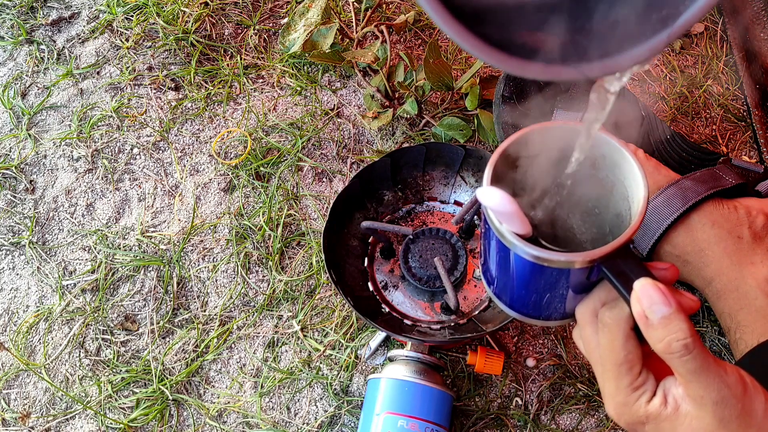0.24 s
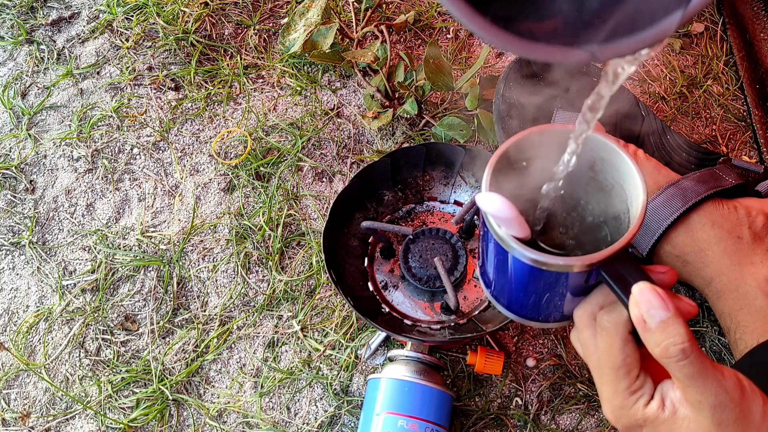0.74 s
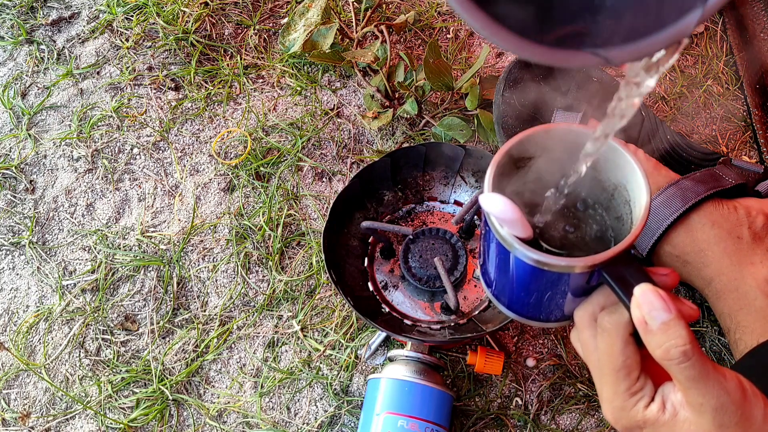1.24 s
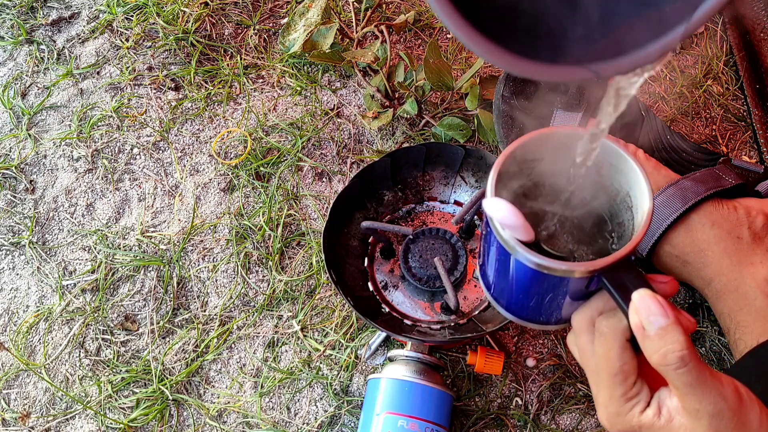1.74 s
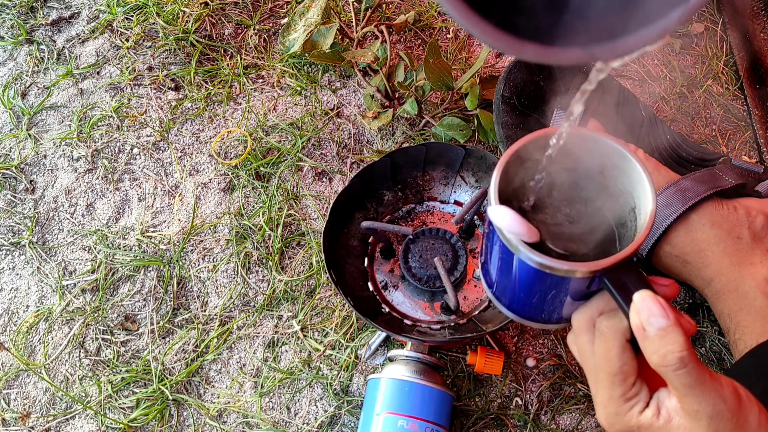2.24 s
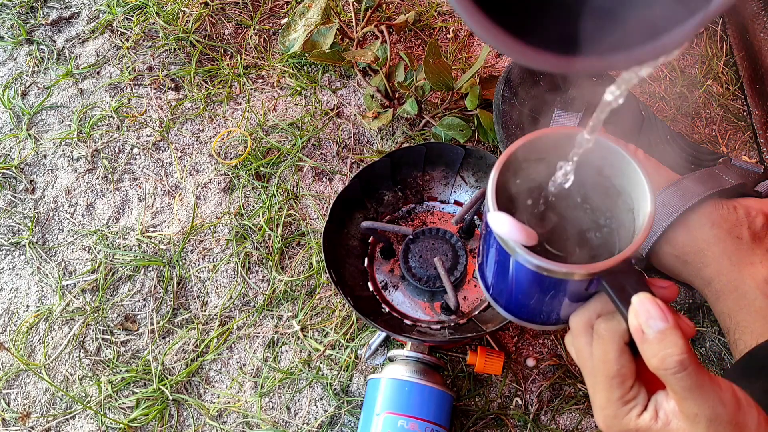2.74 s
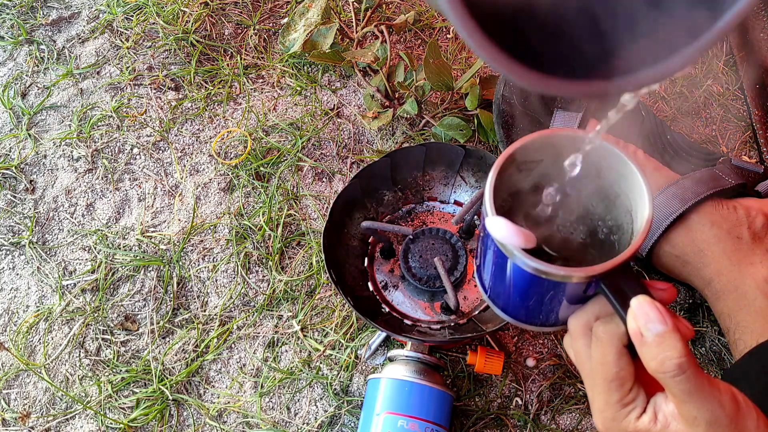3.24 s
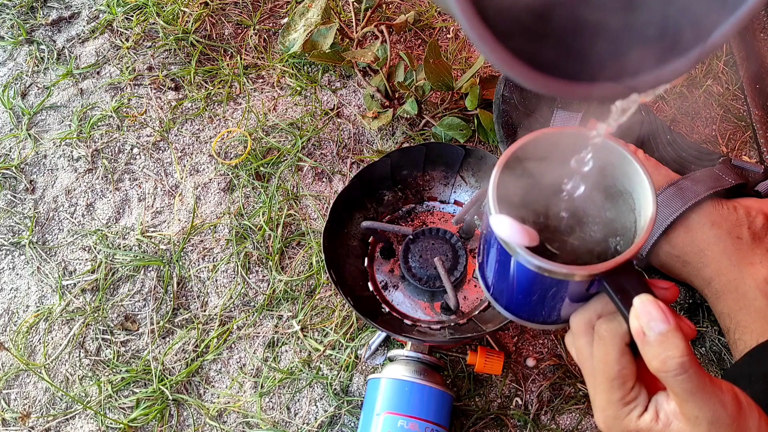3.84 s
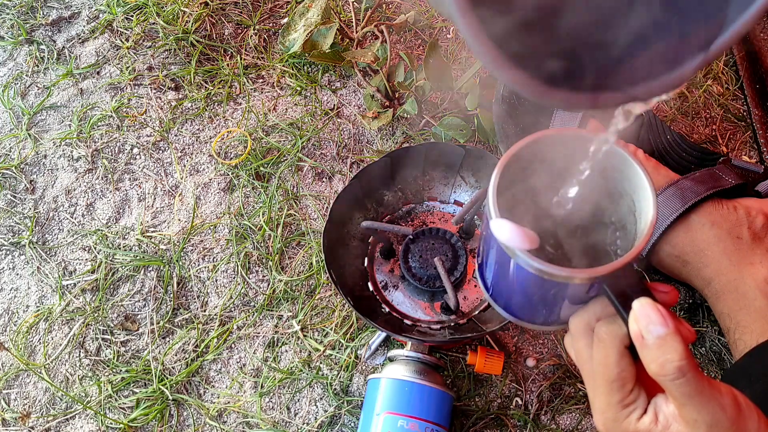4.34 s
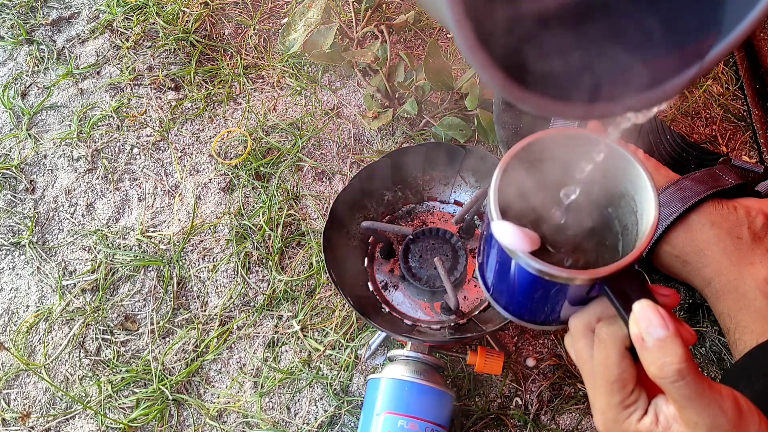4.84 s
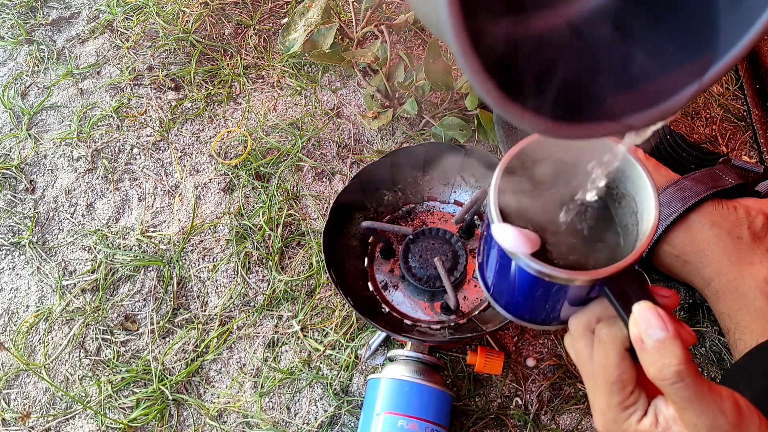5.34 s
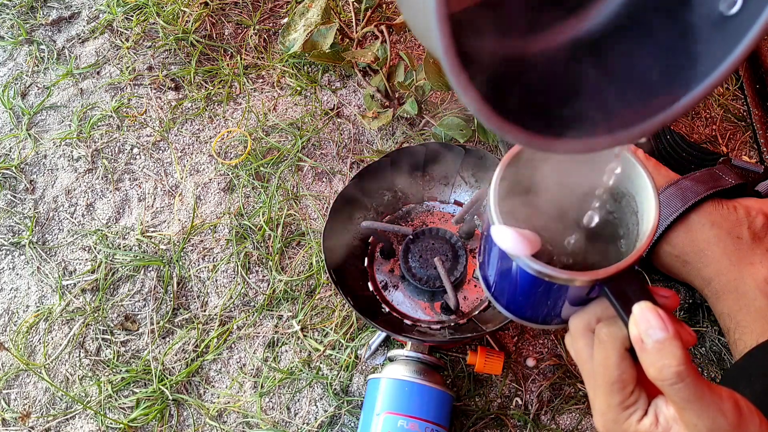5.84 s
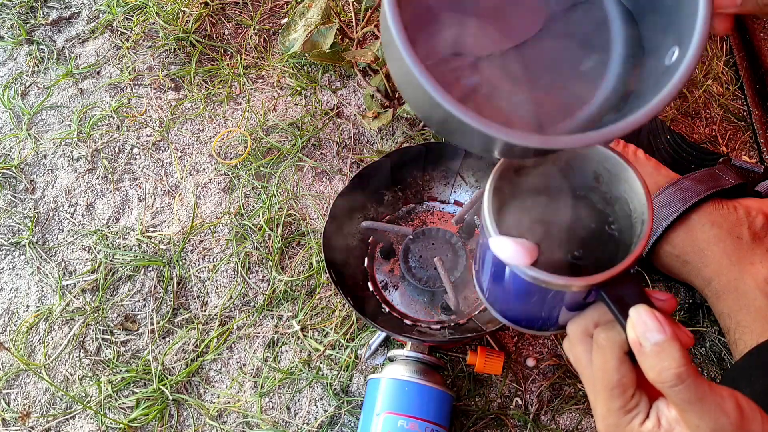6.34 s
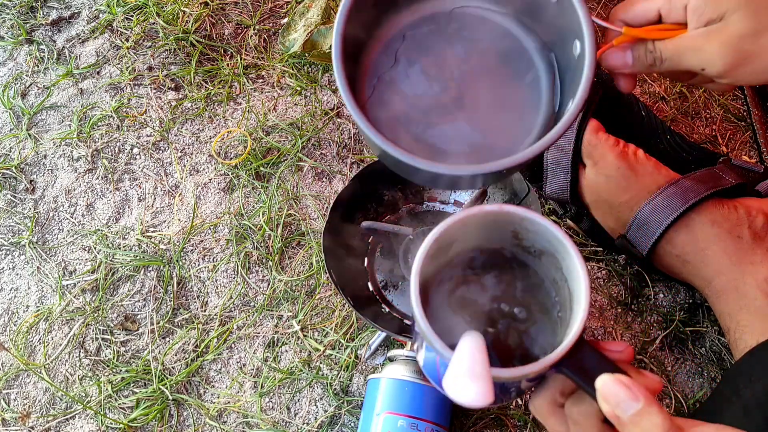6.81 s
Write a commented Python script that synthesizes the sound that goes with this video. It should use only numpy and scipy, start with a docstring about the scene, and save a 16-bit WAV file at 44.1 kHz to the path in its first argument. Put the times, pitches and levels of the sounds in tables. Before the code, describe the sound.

A thin stream of water dribbles from a pot into a metal mug, ending with a sharp metal knock and brief scrape.

```python
"""Hot water dribbles from a camping pot into a metal mug, close by, outdoors.
The thin stream breaks into drops that splash, trap bubbles and ring the air in the mug; the pitch
rises as it fills. Now and then water sizzles on the hot pot wall. As the pot is righted it knocks
against the mug, scrapes off it and ticks once. Low handling bumps and faint open air lie underneath."""
import sys
import numpy as np
from scipy import signal
from scipy.fft import rfft, irfft
from scipy.io import wavfile

SR = 44100
rng = np.random.default_rng(int(sys.argv[2]) if len(sys.argv) > 2 else 0)


def wav_record(signal):
    """Record a signal, one row per channel, as 16-bit PCM in the file named by sys.argv[1]."""
    frames = np.transpose(np.atleast_2d(signal))
    bounded = np.clip(frames, -1, 1)
    # unit amplitude maps onto the largest positive 16-bit level
    quanta = np.round(bounded * 32767).astype(np.int16)
    wavfile.write(sys.argv[1], SR, quanta)


N = 311787
TIME_S = np.arange(N) / SR

# Table levels are relative; the functions apply their own gains.
# outdoor air spectrum: (frequency [Hz], density [dB])
AIR_SPECTRUM = [(8, -3.5), (16, -14.5), (30, -19), (60, -17.5), (110, -21), (200, -29), (500, -35),
                (1300, -40), (2500, -45), (7000, -50.5), (13000, -50), (15500, -53.5)]
# stream strength as the pot tips: (time [s], patter [dB], spray [dB])
STREAM_LEVELS = [(0, -60.5, -64), (0.22, -65, -76.5), (0.45, -65, -71), (0.88, -62, -71),
                 (1.28, -60, -69.5), (1.48, -68, -75.5), (1.78, -58.5, -66.5), (2.0, -70.5, -80),
                 (2.2, -58.5, -74), (2.65, -60.5, -74.5), (3.27, -60.5, -68), (3.6, -65, -73),
                 (3.92, -74.5, -80), (4.15, -59.5, -66.5), (4.3, -67.5, -77), (4.7, -65, -72),
                 (5.1, -68.5, -77.5), (5.55, -64, -71.5)]
# end of the stream: (start [s], end [s], fall [dB])
STREAM_END = (5.73, 5.893, 16)
# air resonances of the filling mug: (time [s], depth mode [Hz], cross mode [Hz])
AIR_MODES = [(0, 967, 2926), (1.5, 986, 2956), (3, 1070, 3030), (4.5, 1124, 2930), (6, 1164, 3155)]
# splash inside the mug: (frequency [Hz], gain [dB])
SPLASH_SPECTRUM = [(200, -36.5), (900, 17.5), (1350, 6), (1750, 13), (2200, -0.5), (2800, -1),
                   (3400, -28.5), (3900, -1), (4900, 5.5), (7200, -1), (9000, 0.5), (11500, -4),
                   (15500, -29)]
# higher air resonances: (frequency [Hz], width [Hz], gain over the splash [dB])
AIR_OVERTONES = [(1566, 50, 1.5), (1888, 88, -2.5), (3150, 42, 33), (4120, 57, 7), (4780, 9.7, 3),
                 (5870, 41, 6), (6560, 51, 0), (7130, 380, 2.5), (7340, 33, 4.5), (8200, 80, -4.5),
                 (8700, 150, 2.5)]
# big drops: (time [s], plop pitch [Hz], plop [dB], gulp [dB], cross ring [dB], splash [dB],
# splash peak [Hz])
BIG_DROPS = [(0.011, 954, -53.5, -85, -50.5, -54, 5500), (0.059, 930, -58.5, -77, -61, -62, 7600),
             (0.331, 910, -59, -83, -59.5, -66, 3860), (0.358, 1060, -55.5, -76, -58, -64, 4500),
             (0.504, 1320, -57, -73, -59, -60, 10700), (0.762, 1230, -58, -57, -40.5, -53.5, 3930),
             (0.811, 950, -50.5, -67, -57, -61, 3920), (0.821, 930, -54.5, -69, -60, -62, 7040),
             (0.87, 950, -47.5, -63, -46.5, -59.5, 3900), (0.898, 960, -65, -63, -61, -58, 7700),
             (0.918, 984, -50, -79, -56, -65, 3900), (0.934, 940, -64, -66, -59, -54.5, 7750),
             (1.022, 970, -61, -72, -59, -59, 7360), (1.103, 1110, -74, -75, -57, -60.5, 3900),
             (1.283, 980, -58, -60, -49.5, -57, 3900), (1.301, 1010, -46, -54.5, -57, -62, 3900),
             (1.579, 940, -51, -58, -71, -71, 3900), (1.754, 950, -61, -81, -50, -62, 4000),
             (1.841, 1050, -58.5, -64, -54.5, -63, 3930), (1.885, 1080, -64, -77, -70, -64.5, 8800),
             (2.109, 1035, -48, -60, -52, -60, 3930), (2.132, 966, -51, -59, -56, -64, 3900),
             (2.204, 948, -47.5, -47.5, -59, -68, 4600), (2.227, 1034, -41.5, -57.5, -54.5, -63, 3900),
             (2.25, 980, -48, -57, -54, -62.5, 3900), (2.264, 1070, -45, -57, -61, -65, 4500),
             (2.28, 1060, -60, -72, -54, -61, 6650), (2.415, 1030, -40.5, -49, -51.5, -60, 3900),
             (2.463, 960, -61, -70, -52, -59, 3890), (2.477, 990, -44.5, -58, -51.5, -65, 3900),
             (2.495, 990, -52, -70, -54, -61, 4570), (2.533, 950, -49.5, -58, -54.5, -65, 3900),
             (2.577, 1060, -44.5, -53.5, -54, -67, 3900), (2.604, 1120, -50.5, -66, -55, -62.5, 3900),
             (2.636, 1080, -51.5, -61, -51.5, -61, 3900), (2.751, 1093, -52, -81, -68, -73, 4400),
             (2.799, 1120, -48.5, -59, -49.5, -57, 3900), (2.819, 1030, -51.5, -72, -51, -56, 4400),
             (2.887, 1280, -59, -71, -47.5, -60, 3900), (2.897, 940, -70, -68, -45.5, -53, 3800),
             (2.928, 975, -49.5, -51, -58, -54, 6200), (2.941, 1130, -48, -55, -66, -64, 6000),
             (2.958, 1100, -56, -54.5, -67, -59, 5200), (3.016, 1100, -64, -77, -64, -56.5, 5950),
             (3.037, 980, -50, -60, -59, -58.5, 4480), (3.062, 1060, -51, -71, -51.5, -75, 3900),
             (3.099, 1070, -56, -67, -56, -59.5, 4500), (3.15, 1210, -69, -67, -55.5, -59.5, 5700),
             (3.163, 1037, -46, -53, -59, -62, 3900), (3.2, 1040, -51, -56, -47, -57.5, 3860),
             (3.225, 1130, -46, -52.5, -40, -58, 3870), (3.246, 1083, -43.5, -69, -48.5, -58, 3900),
             (3.273, 1130, -38.5, -55.5, -56.5, -68, 3900), (3.305, 1010, -48, -56, -72, -63, 4800),
             (3.323, 1070, -51, -58, -63, -59, 6150), (3.369, 1120, -50.5, -64, -56.5, -53.5, 11500),
             (3.407, 1140, -45.5, -58, -56.5, -71, 3900), (3.436, 1110, -57, -68, -80, -57.5, 5900),
             (3.48, 1075, -49, -58, -62, -85, 3900), (3.552, 1090, -51.5, -60, -58, -62.5, 8800),
             (3.579, 960, -44, -49, -62, -71, 3875), (3.673, 1130, -47.5, -48, -51.5, -83, 3900),
             (3.69, 1120, -58, -66, -64, -58.5, 4930), (3.712, 1150, -53.5, -55, -54.5, -68, 8900),
             (3.741, 1070, -50, -56, -51, -56.5, 11400), (3.766, 1080, -54, -66, -58, -63, 9400),
             (3.873, 1133, -52.5, -68, -77, -71, 11200), (4.001, 1100, -78, -74, -63, -57, 5470),
             (4.115, 1100, -50.5, -55.5, -65, -77, 8800), (4.201, 1154, -46, -61, -60, -73, 3900),
             (4.459, 1080, -48.5, -57, -60.5, -70, 3870), (4.513, 990, -63, -60, -59, -54, 8600),
             (4.605, 1140, -54.5, -66, -54.5, -66, 3900), (4.656, 1064, -46.5, -58, -76, -62.5, 5910),
             (4.695, 1160, -49, -56, -71, -73, 5700), (4.73, 1110, -50, -58, -57, -55, 5800),
             (4.749, 1140, -62, -58, -53.5, -52.5, 8900), (4.777, 1170, -52.5, -59, -60, -69, 6700),
             (4.806, 1140, -62, -64, -57, -63.5, 5400), (4.838, 950, -63, -54, -59.5, -61, 9400),
             (4.862, 1230, -53.5, -56.5, -64, -79, 3900), (4.907, 1180, -59, -57, -53, -66, 3900),
             (4.924, 1280, -76, -71, -58.5, -63, 8630), (5.015, 1156, -52, -61, -64, -59, 6700),
             (5.088, 980, -55.5, -55, -62, -69, 7100), (5.134, 1050, -57, -57, -44.5, -55.5, 3800),
             (5.172, 1100, -53, -56.5, -76, -80, 3900), (5.233, 1180, -49, -56, -56.5, -60.5, 6200),
             (5.283, 1150, -59, -55.5, -55, -49.5, 6950), (5.319, 1240, -53, -58, -58, -62, 5780),
             (5.387, 1175, -44.5, -48, -55.5, -70, 3900), (5.412, 1180, -50, -66, -53, -59, 6000),
             (5.452, 1200, -53, -58, -78, -75, 3900), (5.555, 1070, -49, -55.5, -57, -61.5, 7220),
             (5.605, 1175, -36, -60, -60.5, -65, 8700), (5.7, 1120, -54.5, -60, -57.5, -60, 10000),
             (5.967, 914, -60, -79, -88, -78, 11500), (6.117, 1250, -70, -97, -67.5, -67.5, 10800)]
# bead level slopes as the water deepens: (plop [dB/s], gulp [dB/s], cross ring [dB/s], splash [dB/s])
BEAD_SLOPES = (1, 1, 0.56, 1)
# water on the hot wall: (peak time [s], rise [s], fall [s], level [dB], centre [Hz], width [oct])
SIZZLE_SWELLS = [(.435, 0.017, 0.071, -62, 2170, 0.72), (.685, 0.051, 0.016, -66, 2680, 0.26),
                 (.95, 0.13, 0.11, -69, 4740, 0.46), (1.125, 0.016, 0.024, -54, 1940, 0.9),
                 (2.82, 0.051, 0.059, -58.5, 4900, 0.9), (2.98, 0.039, 0.036, -72, 5900, 0.6)]
# larger trapped bubbles: (time [s], level [dB], pitch [Hz])
LARGE_BUBBLES = [(0.4625, -39, 2040), (0.608, -43, 1580), (0.8706, -44, 1570), (1.126, -39.5, 1530),
                 (2.1118, -37.5, 1680), (2.132, -44, 1710), (2.9304, -59, 1790), (3.2233, -41, 1600),
                 (3.917, -44, 1460), (5.235, -44, 1600), (5.4807, -39.5, 1700)]
# handling bumps: (peak time [s], rise [s], fall [s], level [dB], centre [Hz], width [oct])
BUMP_SWELLS = [(2.25, 0.16, .2, -84, 160, 2.2), (2.85, 0.37, .1, -65.5, 69, 0.7),
               (3.07, 0.033, 0.026, -58, 197.3, 0.044), (3.09, 0.047, 0.076, -61, 66.3, 0.16),
               (3.26, 0.17, 0.12, -65, 90, 1.8), (7.045, 0.016, 0.029, -57.5, 167, 1.1),
               (7.058, 0.015, .04, -43, 64, 0.15)]
# pot against mug: (time [s], level [dB], contact time [s])
IMPACTS = [(6.3158, -5.5, 0.0011), (6.3374, -27.5, 0.00027), (6.3545, -38.5, .0003),
           (6.3685, -51.5, 0.00029)]
# modes of pot and mug: (frequency [Hz], level [dB], t60 [s])
METAL_MODES = [(376, -19, 0.094), (449.4, -4.5, 0.14), (684.6, -22, 0.09), (714, -14.5, 0.17),
               (878, -20, .09), (918.6, -10.5, 0.094), (970, 2, 0.025), (1014, 6, 0.055), (1093, -20, .18),
               (1150, -17.5, 0.23), (1346, -22, 0.15), (1624, -20.5, 0.15), (1680, -21, .1),
               (1774, -28, .11), (1780, -23.5, 0.15), (1940, -38, 0.1), (2263, -24, 0.064),
               (2510, -30.5, 0.12), (2812, -22, .055), (2960, -25.5, 0.087), (3520, -29.5, .08),
               (3930, -33, 0.094), (4580, -19, .065), (4430, -28, .06), (4750, -31.5, 0.083),
               (5740, -32.5, 0.052), (6800, -43, .06), (8340, -36, 0.043), (9050, -42, 0.052),
               (11260, -39.5, 0.036)]
# dense clank under the modes: (frequency [Hz], density [dB], t60 [s])
CLANK_SPECTRUM = [(40, -7, 0.049), (160, -11, 0.019), (277, -2.5, 0.066), (347, 4, 0.1), (556, -2.5, 0.032),
                  (835, 8, 0.061), (1266, 0.5, 0.07), (1830, -2, 0.089), (2230, -21, 0.11),
                  (3220, -0.5, 0.027), (4600, -11.5, 0.04), (5200, -14, 0.045), (10500, -23, 0.03),
                  (15640, -36.5, 0.05)]
# rims sliding apart: (time [s], pressure [dB])
RIM_PRESSURE = [(6.38, -67), (6.42, -69), (6.465, -65), (6.482, -54.5), (6.499, -56), (6.502, -46),
                (6.509, -57), (6.525, -80)]
# modes of the rubbed rim: (frequency [Hz], level [dB], t60 [s])
RIM_MODES = [(737, -10.5, 0.11), (1055, -5, 0.11), (1324, -2, 0.074), (1873, -2, 0.042), (3630, -14, 0.055),
             (4409, -30, 0.18), (5749, -37, 0.081), (6400, -30, 0.16)]
# last contact: (time [s], level [dB])
LIFT_TICK = [(6.649, -58.5)]
# modes of that contact: (frequency [Hz], level [dB], t60 [s])
TICK_MODES = [(1420, -2, 0.017), (2640, -0.18, 0.0096)]


def amp(db):
    """Decibels to gain."""
    return 10 ** (np.asarray(db) / 20)


def unit(x):
    """Scale to rms 1."""
    return x / np.sqrt(np.mean(x ** 2) + 1e-30)


def at_level(x, db, span_s=.01):
    """Scale a short sound to the energy of span_s at rms level db."""
    return x * amp(db) * np.sqrt(span_s * SR / np.sum(x ** 2))


def lookup(points, hz):
    """Interpolate on a log-frequency axis."""
    point_hz, value = np.transpose(points)[:2]
    return np.interp(np.log(hz + 1), np.log(point_hz + 1), value)


def add(mix, s, sound):
    """Mix a sound in at time s."""
    part = mix[max(round(s * SR), 0):][:len(sound)]
    part += sound[:len(part)]


def colour(x, points, size=4096):
    """Minimum-phase filter from (frequency [Hz], gain [dB]) points; attacks stay sharp."""
    log_gain = np.log(amp(lookup(points, abs(np.fft.fftfreq(size, 1 / SR)))))
    taps = np.fft.ifft(np.exp(np.conj(signal.hilbert(log_gain)))).real
    return signal.fftconvolve(x, taps[:size // 2])[:len(x)]


def resonate(x, hz, width_hz):
    """Unity-gain resonance, steady or gliding."""
    carrier = np.exp(2j * np.pi * np.cumsum(hz * np.ones(len(x))) / SR)
    pole = np.exp(-np.pi * width_hz / SR)
    return 2 * (carrier * signal.lfilter([1 - pole], [1, -pole], x / carrier + 1e-18)).real


def ring(modes, t):
    """Decaying modes, starting in phase."""
    return sum(amp(db - 60 * t / t60_s) * np.sin(2 * np.pi * hz * t) for hz, db, t60_s in modes)


def clicks(per_s, spread_db):
    """Random impulses of uneven size."""
    size = amp(spread_db * np.minimum(rng.exponential(1, N), 4)) * rng.choice([-1, 1], N)
    return unit(size * (rng.random(N) < per_s / SR))


def burst(t, rise_s, decay_s, tail_db, tail_s=0.0049):
    """Splash envelope: quick rise, quick fall, weaker tail."""
    return (1 - np.exp(-(t / rise_s) ** 2)) * (np.exp(-t / decay_s) + amp(tail_db) * np.exp(-t / tail_s))


def swells(rows, source):
    """Gaussian swells of a source, each in its own band."""
    octave = np.log2(np.fft.rfftfreq(N, 1 / SR) + 1)
    spectrum, out = rfft(source), np.zeros(N)
    for s, rise_s, fall_s, db, hz, width_oct in rows:
        band = unit(irfft(spectrum * np.exp(-.5 * ((octave - np.log2(hz)) / width_oct) ** 2), N))
        envelope = np.exp(-.5 * ((TIME_S - s) / np.where(TIME_S < s, rise_s, fall_s)) ** 2)
        out += amp(db) * band * envelope
    return out


def outdoor_air(level_db=-63, drift_db=2):
    """Faint even hiss over the rumble of slowly moving air."""
    hz = np.fft.rfftfreq(N, 1 / SR)
    spectrum = rfft(rng.standard_normal(N)) * amp(lookup(AIR_SPECTRUM, hz))
    drift = unit(irfft(rfft(rng.standard_normal(N)) * np.exp(-hz / 3), N))
    steady = irfft(spectrum, N)
    rumble = irfft(spectrum / (1 + (hz / 150) ** 2), N)
    return amp(level_db) * (steady + rumble * (amp(drift_db * drift) - 1)) / np.std(steady)


def flow_db(s):
    """Patter and spray levels at times s; both fall as the stream ends."""
    when_s, patter_db, spray_db = np.transpose(STREAM_LEVELS)
    fall_db = np.interp(s, STREAM_END[:2], [0, STREAM_END[2]])
    return np.interp(s, when_s, patter_db) - fall_db, np.interp(s, when_s, spray_db) - fall_db


def mug_modes_hz(s):
    """Depth and cross resonances of the air in the mug at times s."""
    when_s, depth_hz, cross_hz = np.transpose(AIR_MODES)
    return np.interp(s, when_s, depth_hz), np.interp(s, when_s, cross_hz)


def in_mug(x):
    """The mug's hollow colours spray and adds its overtones."""
    hollow = colour(signal.unit_impulse(4096), SPLASH_SPECTRUM)
    overtones = sum(amp(db) * resonate(hollow, hz, width_hz) for hz, width_hz, db in AIR_OVERTONES)
    return signal.oaconvolve(x, hollow + overtones)[:N]


def droplets(per_s, spread_db, decay_s):
    """Crowd of tiny splashes, each a decaying puff of noise."""
    power = signal.lfilter([1], [1, -np.exp(-2 / (decay_s * SR))], clicks(per_s, spread_db) ** 2)
    return unit(np.sqrt(power) * rng.standard_normal(N))


def bubble(hz, cycles, glide):
    """One bubble: a tone that swells, rises slightly and dies within a few cycles."""
    age = np.arange(round(.02 * SR)) / SR * hz / cycles
    envelope = 2 * age * np.exp(1 - 2 * age)
    pitch_hz = hz * (1 + glide * np.tanh(age - .5))
    return envelope * np.sin(2 * np.pi * np.cumsum(pitch_hz) / SR)


def tiny_bubbles(per_s=170, spread_db=2, sizes=24):
    """Trapped bubbles of many sizes ring at random times."""
    out = np.zeros(N)
    for hz in np.geomspace(1300, 6000, sizes):
        tone = bubble(hz, cycles=2.8, glide=0.036) / np.sqrt(hz)
        for position, weakness in rng.random((round(per_s * N / SR / sizes), 2)):
            add(out, position * N / SR, amp(-spread_db * np.log(weakness + .05)) * tone)
    return unit(out)


def trickle(gain_db=-3.5):
    """The finest droplets patter, bubble and spray in the mug."""
    patter_db, spray_db = flow_db(TIME_S)
    depth_hz, cross_hz = mug_modes_hz(TIME_S)
    taps = droplets(per_s=590, spread_db=4, decay_s=0.00047)
    depth = unit(resonate(taps, depth_hz, width_hz=102))
    cross = amp(-3) * unit(resonate(taps, cross_hz, width_hz=150))
    gulp = amp(-8) * unit(resonate(taps, 410, width_hz=180))
    thud = amp(-12) * unit(resonate(taps, 270, width_hz=440))
    wash = amp(-6) * unit(resonate(taps, 910, width_hz=2800))
    patter = unit(colour(depth + cross + gulp + thud + wash, [(3400, 1.5), (5000, -20), (12000, -21)]))
    patter += amp(-6) * tiny_bubbles()
    mist = unit(in_mug(droplets(per_s=180, spread_db=1.5, decay_s=0.0038)))
    return amp(gain_db) * (amp(patter_db) * patter + amp(spray_db) * mist)


def crackle(gain_db=-6):
    """Pinhead droplets tick on the metal wall, louder when the spray is strong."""
    _, spray_db = flow_db(TIME_S)
    hits = unit(in_mug(droplets(per_s=45, spread_db=4, decay_s=0.00026)))
    return amp(spray_db + gain_db) * hits


def drops(rows, chirp=0.067, roughness=0.24):
    """Each drop slaps the surface and opens a crater that pumps the air in the mug."""
    t = np.arange(round(.05 * SR)) / SR
    tones, spray = np.zeros((2, N))
    for s, hz, plop_db, gulp_db, cross_db, splash_db, bright_hz in rows:
        grit, froth, fizz = rng.standard_normal((3, len(t)))
        phase, detune, length, depth, girth, trapped = rng.uniform(-1, 1, 6)
        depth_hz, cross_hz = mug_modes_hz(s)
        # crater pulse rises in pitch as it closes; the air column rings on
        turns = np.cumsum(hz * (1 + chirp * np.tanh(t / 0.0032 - 1))) / SR
        pulse = np.sin(2 * np.pi * turns + np.pi * phase) + roughness * grit
        pulse *= burst(t, rise_s=0.0024, decay_s=0.0011, tail_db=-25)
        plop = resonate(pulse, hz, width_hz=620) + .5 * resonate(pulse, depth_hz, width_hz=550)
        add(tones, s, at_level(plop, plop_db))
        # closing crater traps a bubble
        blip = bubble(1650 * 1.124 ** trapped, cycles=4, glide=0.089)
        add(tones, s, amp(plop_db - 9 + 3.6 * length) * blip)
        # displaced water
        gulp = np.sin(2 * np.pi * 560 * (1 + 0.19 * girth) * t + np.pi * phase)
        gulp *= burst(t, rise_s=0.0034, decay_s=0.0013, tail_db=-21.5)
        add(tones, s, at_level(gulp, gulp_db - 1))
        thud = resonate(grit * np.exp(-t / 0.0025), 300 * 2.75 ** depth, width_hz=150)
        add(tones, s, at_level(thud, gulp_db - 10))
        # slap rings the cross mode, detuned by the landing spot
        slap = froth * burst(t, rise_s=0.0009, decay_s=0.0022, tail_db=-44)
        cross = resonate(slap, cross_hz * (1 + 0.028 * detune), width_hz=84)
        cross = resonate(cross, cross_hz, width_hz=1400)
        add(tones, s, at_level(cross, cross_db))
        # splash snaps at impact, then fizzes
        snap = amp(-3) * np.exp(-t / 0.00029)
        fizz *= snap + burst(t, rise_s=0.0001, decay_s=0.0052 * 2.0 ** length, tail_db=-5)
        splash = fizz + amp(7) * resonate(fizz, bright_hz, width_hz=0.19 * bright_hz)
        add(spray, s, at_level(splash, splash_db - 2))
    return tones + in_mug(spray)


def satellites(delay_s=(0.0047, 0.011), pitch_scatter=0.156, gain_db=-12.5, cap_db=-60):
    """A weaker droplet lands just behind each big drop."""
    rows = np.array(BIG_DROPS, float)
    lag, detune = rng.random((len(rows), 2)).T
    rows[:, 0] += np.interp(lag, [0, 1], delay_s)
    rows[:, 1] *= 1 + pitch_scatter * (2 * detune - 1)
    rows[:, 2:6] = np.minimum(rows[:, 2:6] + gain_db, cap_db)
    return drops(rows)


def beads(per_s=30, jitter=.3, pitch_scatter=0.078, bright_oct=0.46, scatter_db=3, clear_s=.014):
    """Between big drops the stream beads into small, loosely regular ones that follow its strength."""
    end_s = STREAM_END[1]
    chance = np.clip(rng.standard_normal((300, 7)), -2, 2)
    s = (np.arange(len(chance)) + jitter * chance[:, 0]) / per_s
    depth_hz, _ = mug_modes_hz(s)
    plop_hz = depth_hz * (1 + pitch_scatter * chance[:, 1])
    bright_hz = 5500 * 2 ** (bright_oct * chance[:, 2])
    patter_db, spray_db = flow_db(s)
    # plop, gulp, cross ring, splash
    levels_db = np.transpose([patter_db + 2.5, patter_db - 7, patter_db - 1, spray_db + 3])
    levels_db += scatter_db * chance[:, 3:] + np.outer(s - end_s / 2, BEAD_SLOPES)
    gap_s = abs(s[:, None] - np.transpose(BIG_DROPS)[0]).min(1)
    rows = np.column_stack([s, plop_hz, levels_db, bright_hz])
    return drops(rows[(gap_s > clear_s) & (s < end_s)])


def sizzle():
    """Water spits on the hot pot wall in short swells."""
    return swells(SIZZLE_SWELLS, droplets(per_s=1400, spread_db=1, decay_s=0.0003))


def large_bubbles(gain_db=-3):
    """Single bubbles, pinched off by drops, ring above the plops."""
    out = np.zeros(N)
    for s, db, hz in LARGE_BUBBLES:
        add(out, s, amp(db + gain_db) * bubble(hz, cycles=2.8, glide=0.063))
    return out


def handling():
    """Soft low bumps from handling the cookware."""
    return swells(BUMP_SWELLS, rng.standard_normal(N))


def knock(modes_db=-2, clank_db=-10, rebound_db=6, grip_s=0.065, lead_s=.0008):
    """Thin metal clanks and rebounds three times; the hands damp the ring."""
    t, out = np.arange(round(.25 * SR)) / SR, np.zeros(N)
    damping = np.exp(-(t / grip_s) ** 4)
    decays = [(hz, t60_s) for hz, _, t60_s in CLANK_SPECTRUM]
    for k, (s, db, contact_s) in enumerate(IMPACTS):
        hz, frame_s, noise = signal.stft(rng.standard_normal(len(t)), SR, nperseg=256)
        fade = amp(-60 * frame_s / lookup(decays, hz)[:, None])
        dying = signal.istft(noise * fade, SR, nperseg=256)[1][:len(t)]
        clank = colour(dying * (1 - np.exp(-t / 0.00065)), CLANK_SPECTRUM)
        # light rebounds rattle more than they ring
        add(out, s - lead_s, at_level(clank * damping, db + clank_db + rebound_db * (k > 0)))
        envelope = (1 - np.exp(-t / contact_s)) * (.9 * damping + 0.15)
        add(out, s, amp(db + modes_db) * ring(METAL_MODES, t) * envelope)
    return out


def scrape(ring_db=-1, hiss_db=-5):
    """Tiny slips between the rims ring the metal and hiss."""
    s, pressure_db = np.transpose(RIM_PRESSURE)
    pressure = amp(np.interp(TIME_S, s, pressure_db, left=-150, right=-150))
    slips = clicks(per_s=7000, spread_db=1.0) * pressure
    rim = ring(RIM_MODES, np.arange(SR // 4) / SR)
    ringing = signal.fftconvolve(slips, rim / np.linalg.norm(rim))[:N]
    hiss = colour(slips, [(300, -4), (1200, -18), (2400, 3), (3500, 7), (9000, -1.0), (15000, -34)])
    return amp(ring_db) * ringing + amp(hiss_db) * hiss


def tick():
    """Faint metal contact as the pot lifts away."""
    out = np.zeros(N)
    for s, db in LIFT_TICK:
        add(out, s, amp(db) * ring(TICK_MODES, np.arange(SR // 20) / SR))
    return out


def scene():
    """Water, cookware and open air, mono."""
    hot_wall = sizzle()
    cookware = knock() + scrape() + tick() + handling()
    air = outdoor_air()
    water = trickle() + crackle() + large_bubbles() + drops(BIG_DROPS) + satellites() + beads()
    return (water + hot_wall + cookware + air)[None]


def record(dry, cutoff_hz=15750):
    """Clip at full scale, then low-pass."""
    lowpass = signal.firwin(511, cutoff_hz, window=("kaiser", 9), fs=SR)
    return signal.oaconvolve(np.clip(dry, -1, 1), lowpass[None], "same")


dry = scene()
out = record(dry)
wav_record(out)
```